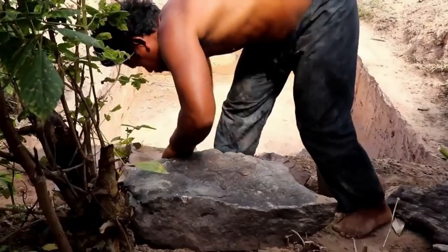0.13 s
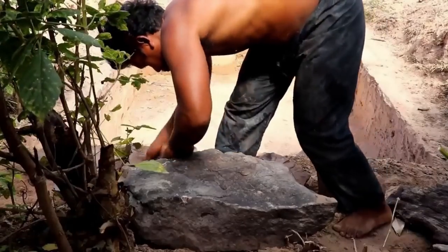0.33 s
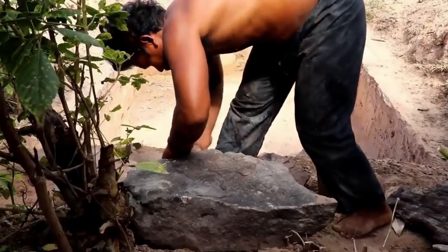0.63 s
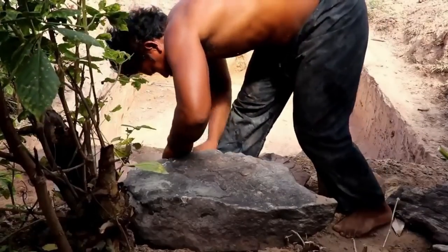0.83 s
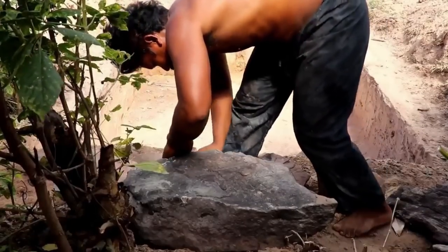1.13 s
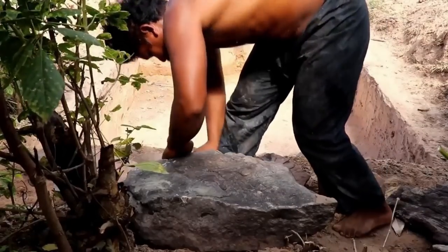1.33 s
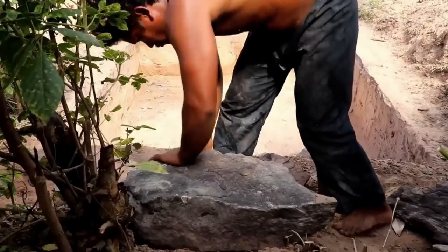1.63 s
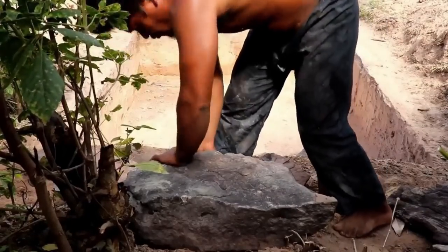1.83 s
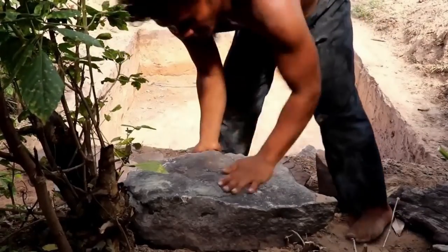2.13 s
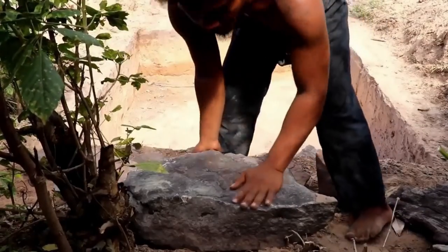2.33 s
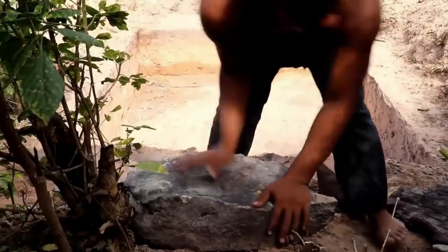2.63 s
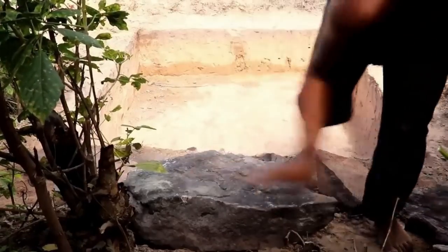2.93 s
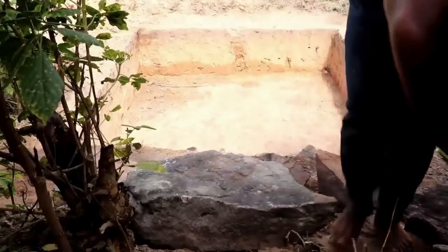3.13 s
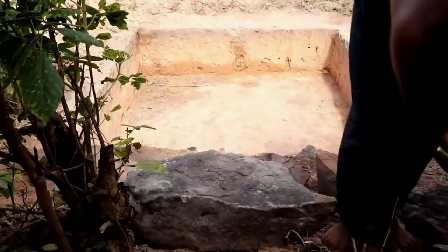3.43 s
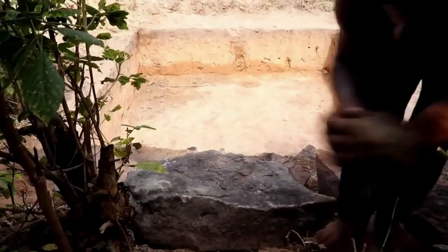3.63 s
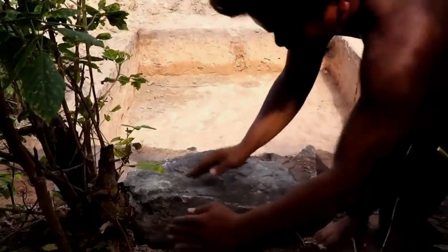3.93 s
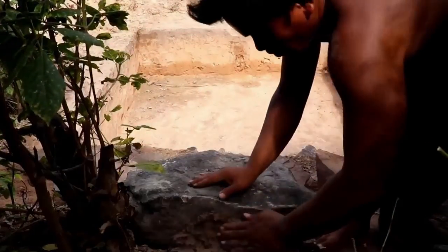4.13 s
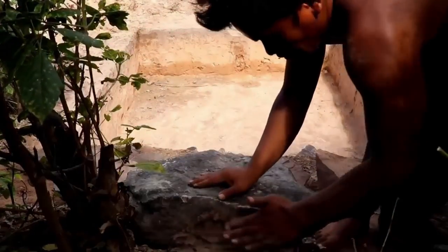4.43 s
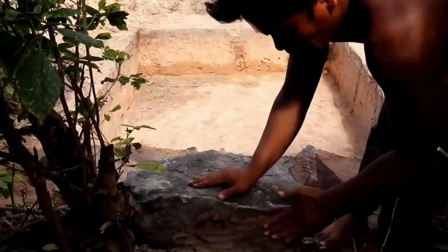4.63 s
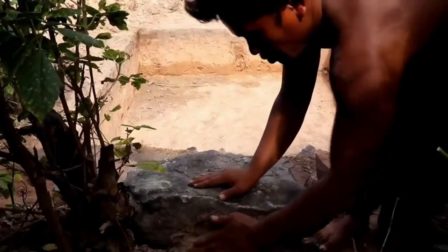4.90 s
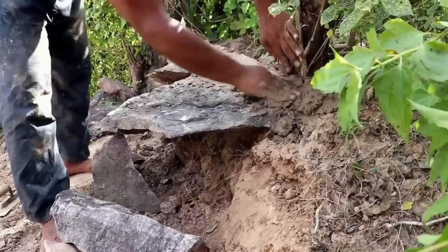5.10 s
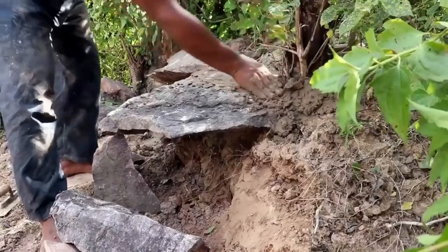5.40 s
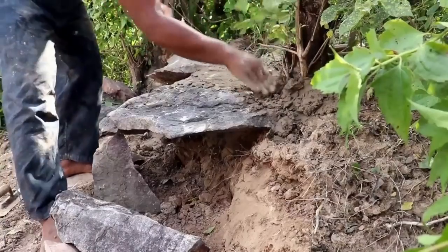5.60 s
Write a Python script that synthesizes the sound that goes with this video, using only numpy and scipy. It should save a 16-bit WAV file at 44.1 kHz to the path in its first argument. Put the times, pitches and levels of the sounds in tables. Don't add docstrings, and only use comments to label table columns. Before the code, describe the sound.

Close stereo outdoor capture of hands working soil on a stone slab: short gritty scrapes, dull ground thumps, then dry stone knocks at intervals. Leaves rustle faintly in a breeze over low rumble. After a quieter, soft passage come several hard clacks, the middle one loudest. A tiny gap follows, then faint soil pats from a farther, calmer position with a distant low machine drone.

```python
import sys
import numpy as np
from scipy import signal
from scipy.fft import rfft, irfft
from scipy.io import wavfile
from scipy.ndimage import uniform_filter1d

SR = 44100
rng = np.random.default_rng(int(sys.argv[2]) if len(sys.argv) > 2 else 0)


def invert_db(x):
    u = np.asarray(x, float) / 20
    return 10 ** u


def materialize(psi):
    bounded = np.clip(np.atleast_2d(psi).T, -1, 1)
    quanta = np.round(bounded * 32767).astype(np.int16)
    wavfile.write(sys.argv[1], SR, quanta)


N = 254016

# (frequency [Hz], density [dB per Hz])
AIR_SPECTRUM = [(76, -27), (130, 1), (296, -7.5), (562, -3.5), (900, -4.5), (1500, -3.5), (2100, -4.5),
                (3770, -11.5), (4700, -12), (8760, -18), (13100, -25.5), (14700, -27.5), (15500, -46)]
# (frequency [Hz], likeness [0-1])
AIR_LIKENESS = [(60, 0.38), (180, 0.58), (550, 0.15), (1650, 0.018), (4970, 0.1), (15000, 0.02)]
# (frequency [Hz], level [dB])
AIR_LEAN = [(60, 0.5), (180, 1.5), (550, 1.5), (1650, -1.5), (4970, -0.5), (15000, 0)]
# (time [s], breeze [dB], dryness of leaves [dB])
BREEZE = [
    [(0, -43.5, -5.5), (.31, -48, 2.5), (.69, -49.5, 2.5), (1.32, -47.5, 1.5), (1.61, -46.5, -2.5),
     (1.9, -48, -0.5), (2.15, -45.5, -3), (2.5, -48.5, 1), (3.1, -49.5, -.5), (3.4, -48, 4),
     (3.72, -49, 3.5), (4.1, -46.5, 0.5), (4.51, -50, 5.5), (5.0, -50, 5.5)],
    [(5.065, -53.5, 0), (5.21, -56, 4), (5.36, -54.5, 1.5), (5.76, -55.5, 5)],
]
# (time [s], level [dB], time to sink 13 dB [s])
BUMPS = [(.02, -54, 1), (.3, -50.5, 0.5), (.5, -48.5, .13), (.67, -46, .09), (.95, -48, .1),
         (1.08, -50.5, .25), (1.33, -47, .07), (1.47, -45.5, 0.2), (1.67, -45, 0.15), (1.78, -51, 0.12),
         (2.06, -48, .1), (2.27, -48, .1), (2.44, -48.5, 0.1), (2.72, -47, 0.26), (2.89, -43.5, 0.04),
         (3.2, -48, 0.3), (3.39, -48, .2), (3.51, -51.5, .12), (3.85, -51, .3), (4.01, -38.5, .04),
         (4.24, -48.5, 0.3), (4.52, -45.5, .1), (4.67, -48.5, .08), (4.8, -46, .09), (5.03, -47, 0.24),
         (5.165, -50.5, .1), (5.31, -57, .05), (5.567, -57, .08), (5.74, -56.5, 0.5)]
# (start [s], frequency [Hz], width [Hz], level [dB])
DRONE = (5, 160.5, 7.5, -57.5)
# (time [s], length [s], from [Hz], to [Hz], level [dB])
HUMS = [(.495, .04, 92, 88, -50), (.655, 0.059, 88, 80, -48), (2.855, .12, 122.3, 98, -49),
        (3.17, .09, 95, 72, -53), (3.355, .18, 90, 98, -50), (4.19, 0.13, 90, 85, -53),
        (5.07, 0.12, 165.4, 150, -55), (1.6, .1, 151, 141, -55), (4.06, .085, 540, 530, -56),
        (4.23, .065, 530, 520, -57), (3.72, .025, 2420, 2400, -52), (.135, .025, 1840, 1740, -53)]
# (frequency [Hz], density [dB per Hz])
GRIT_SPECTRUM = [(59, -31), (100, -1), (412, 1.5), (700, -4), (1000, -5), (1770, -5.5), (4500, -10),
                 (12900, -20), (15700, -31)]
LAYER_EDGES_HZ = (150, 800, 3500, 8000)
# (time [s], length [s], grit [dB], thud minus grit [dB], sand minus grit [dB])
DIGS = [(.256, .04, -44, -6, -5), (1.407, 0.045, -41, -6, -4.5), (2.031, .051, -46.5, -.5, -1),
        (2.685, 0.052, -43, -3, -1.5), (3.172, 0.058, -48, -2, -1), (3.355, 0.078, -50, 1, 3),
        (3.806, 0.063, -52, 2, 7.5), (4.507, 0.033, -37, -4, -10), (4.675, 0.029, -44, -5, 2),
        (4.743, 0.033, -47.5, 0, 9), (0.378, .155, -49.5, -2, -7), (1.411, .012, -47, -9, 0),
        (5.128, 0.0092, -51, -9, 1), (4.914, .014, -54, -4, 13), (.068, 0.07, -51.5, -14, -7)]
# (time [s], length [s], grit [dB], thud minus grit [dB], sand minus grit [dB])
SWEEPS = [(.295, 0.021, -45, -14, -2), (.315, .072, -43, -10, -4), (.41, .037, -50, -3, -14),
          (.642, 0.054, -47.5, -4, -2.5), (1.054, 0.035, -33, -20, -8), (1.315, .02, -45, 2, -6),
          (1.439, .04, -39, 4, -7), (1.468, .075, -37.5, -5, -4), (1.57, 0.053, -51.5, -7, -1),
          (1.955, .07, -43, -16, -12), (2.1, .075, -46, -12, -9), (2.855, 0.046, -46.5, 2, -4)]
# (time [s], length [s], grit [dB], thud minus grit [dB], sand minus grit [dB])
PATS = [(4.191, .14, -53, -4, 7), (3.87, 0.13, -59, -3, 9.5), (4.3, .15, -57, -5, 5.5),
        (4.55, 0.07, -54, -9, 5), (4.997, .017, -40, -5, 1), (5.012, 0.038, -42.5, -8, 3.5),
        (5.122, 0.021, -51, 0, -3), (5.231, .011, -48.5, -8, -1), (5.266, .017, -51, -2, -1),
        (5.35, .18, -58.5, -8, -7), (5.555, .03, -55, 5, 3), (5.677, 0.057, -53, 1, -2)]
# (time [s], length [s], grit [dB], thud minus grit [dB], sand minus grit [dB])
SHOVES = [
    (1.235, 0.068, -38.5, -14, -11),
    (1.78, 0.073, -44.5, 1, -6),
    (2.262, 0.061, -37, -8.5, .5),
    (3.47, 0.16, -56, -2.5, 8),
    (3.945, .095, -42, -5, 4),
    (4.9, .042, -49, 2, 5),
    (4.926, 0.012, -50, -6, 11.5),
]
# (time [s], level [dB], thud minus crack [dB], sand minus crack [dB], rise [s])
CRUSHES = [
    (.921, -38, -8, 1, .012),
    (1.047, -29.5, -14, -3.5, .015),
    (1.302, -31, -9, -4, .012),
    (2.448, -31, -9, 5, 0.034),
    (4.005, -39, -2, -2, .12),
    (4.502, -31.5, -7, -1, 0.023),
    (4.669, -26, -12, 2.5, 0.03),
    (4.805, -34, -11, 4, 0.027),
]
# (start [s], end [s], level over grit [dB])
RUBBED = [
    (.1, .8, -4),
    (1.01, 1.6, -3),
    (3.9, 4.1, -5),
]
# (frequency [Hz], width [Hz], level [dB])
FLAT_STONE = [(650, 93, -4), (1110, 58, 3), (1960, 130, -2.5), (2550, 100, -13), (3570, 67, -19)]
# (frequency [Hz], width [Hz], level [dB])
HARD_STONE = [(587, 54, -4), (1260, 64, -2), (1694, 39, -4), (2360, 110, -9), (2790, 81, 0.5),
              (3200, 69, -25), (5300, 530, -11)]
# (frequency [Hz], width [Hz], level [dB])
ROUND_STONE = [(900, 42, 1), (1390, 25, -11), (1840, 150, -5), (3350, 32, -14)]
# (time [s], peak [dB], ring [Hz])
PEBBLES = [(1.0563, -30, 1230), (1.0583, -29, 2730), (1.0633, -32, 4480), (1.0648, -35, 3940),
           (1.0648, -27, 1700), (1.0688, -34, 3620), (1.0723, -31, 4030), (1.0797, -39, 4440),
           (1.2688, -34, 2330), (1.2758, -34, 4480), (1.2808, -31, 2800), (1.2838, -35, 1080),
           (1.2863, -33, 1940), (1.2868, -31, 2690), (1.3102, -37, 4290), (1.3127, -33, 1120),
           (1.4205, -34, 1010), (1.4235, -38, 3810), (1.4245, -32, 1640), (1.425, -38, 3170),
           (1.4319, -34, 1060), (1.4419, -34, 2890), (1.4464, -34, 2050), (1.4534, -31, 2730),
           (1.4559, -32, 1120), (1.4629, -31, 2760), (1.4768, -34, 1310), (1.4773, -35, 2730),
           (1.4793, -38, 4890), (1.4843, -35, 2370), (1.4893, -36, 4780), (1.4933, -34, 1230),
           (1.5103, -31, 490), (4.673, -24, 3270), (1.441, -33, 1270), (3.962, -37, 1130),
           (1.5167, -33, 4820), (1.5172, -36, 2780), (1.5222, -34, 560), (2.289, -34, 4500),
           (2.2895, -38, 3920), (2.2945, -35, 3380), (2.295, -34, 3060), (2.297, -35, 4410),
           (2.297, -34, 2150), (2.3075, -33, 4650), (2.3089, -34, 600), (2.4382, -35, 3400),
           (3.9662, -40, 4930), (3.9826, -40, 4690), (3.9946, -32, 1810), (4.0061, -36, 4410),
           (4.0196, -32, 1030), (4.6591, -29, 1290), (4.7419, -38, 3400), (4.7494, -38, 4780),
           (4.7938, -40, 4740)]
# (time [s], peak [dB], ring [Hz])
GRAVEL = [(0.2569, -43, 3340), (0.2574, -39, 880), (0.2619, -39, 2610), (0.2654, -38, 1270),
          (0.2659, -40, 1810), (0.2674, -34, 690), (0.3003, -41, 2910), (0.3023, -35, 1960),
          (0.3028, -38, 1270), (0.3128, -42, 2890), (0.3238, -38, 1460), (0.3253, -39, 1100),
          (0.3327, -41, 620), (0.3352, -42, 1120), (0.3372, -42, 2540), (0.3442, -37, 1960),
          (0.3457, -39, 620), (0.3552, -41, 600), (0.3557, -33, 1140), (0.3592, -37, 2000),
          (0.3672, -37, 1790), (0.3801, -40, 1920), (0.3961, -40, 2020), (0.4111, -40, 650),
          (0.417, -37, 1120), (0.425, -34, 1140), (0.458, -42, 2650), (0.4944, -42, 2520),
          (1.7775, -40, 540), (1.8243, -41, 2370), (1.8308, -38, 1740), (1.9805, -41, 2350),
          (1.986, -39, 1250), (1.9895, -40, 2350), (1.993, -37, 1420), (1.9975, -38, 2300),
          (2.0084, -40, 1940), (2.0468, -38, 690), (2.0508, -40, 2090), (2.1272, -39, 1210),
          (2.1331, -40, 2090), (2.6904, -41, 2990), (2.6944, -38, 540), (2.6959, -41, 2840),
          (2.8655, -40, 560)]
# (time [s], peak [dB], ring [Hz])
CLODS = [
    (.39, -42, 240),
    (.43, -42, 220),
    (1.83, -40, 210),
    (2.3, -40, 240),
]
# (time [s], peak [dB], ring [Hz])
GRIPPED = [(.9213, -19, 1750), (1.3016, -14.5, 395), (4.8053, -21, 5250), (4.6678, -20, 2600),
           (.9215, -26, 3550), (.9228, -27, 4750), (.9234, -26, 1550), (1.0453, -26, 5800),
           (1.301, -16, 2800), (1.304, -23, 1880), (1.413, -40, 3500), (2.4478, -23, 4500),
           (4.5025, -18, 2840), (4.509, -24, 1510), (4.6674, -6.5, 3250), (4.6708, -23, 560),
           (.9225, -28.5, 420), (5.0015, -30, 7600), (3.178, -38, 4000), (2.4466, -23, 560),
           (4.5005, -24, 430), (4.5008, -27, 4200), (4.6661, -21, 4480), (1.0468, -26, 2670),
           (.9206, -29, 4500), (1.3215, -33, 290), (3.9845, -31, 900), (1.447, -33, 650), (3.992, -30, 900),
           (2.4482, -19, 3300), (4.6712, -15, 5950), (4.8052, -11, 6640), (4.8056, -13.5, 3200),
           (4.806, -23, 485), (5.13, -39, 6000), (5.234, -31, 2700), (5.2345, -41, 5300),
           (.9222, -24, 4250), (1.3035, -26, 6800), (2.4505, -21, 7500)]
# (time [s], peak [dB], ring [Hz])
LOOSE = [(.9215, -32.5, 230), (.922, -26, 604), (1.0482, -18, 1200), (1.049, -20, 1960),
         (1.0678, -24, 2600), (1.0722, -23, 1900), (1.072, -36, 300), (1.048, -35, 280), (1.3015, -21, 285),
         (1.3025, -27, 3150), (1.3018, -22, 2130), (.9232, -27, 1310), (.9214, -21, 2040),
         (2.4472, -26, 1130), (2.4485, -27, 2760), (4.6688, -22, 3730), (4.67, -22, 8000),
         (3.9925, -31, 1040), (4.0025, -30, 2060), (4.0005, -33, 440), (1.3025, -23, 1065),
         (1.3033, -23, 685), (2.4477, -14.5, 3500), (2.4477, -14.5, 2460), (2.4505, -27, 350),
         (2.45, -31, 160), (2.4506, -16, 2450), (2.4502, -24, 2200), (4.0008, -24, 930), (4.0108, -25, 900),
         (4.0085, -30, 220), (3.995, -30, 400), (4.0235, -31, 480), (4.026, -32, 620), (4.503, -26.5, 288),
         (4.6688, -10.5, 1090), (4.6676, -21, 790), (4.6712, -32, 440), (4.6705, -20, 2200),
         (4.669, -10.5, 1720), (4.6696, -12.5, 7400), (4.67, -34, 260), (4.934, -30, 7540),
         (5.004, -31, 3120), (5.2722, -37, 2500), (5.2765, -38, 470)]
# (time [s], peak [dB], ring [Hz])
BEDDED = [(1.4445, -24, 265), (1.449, -29, 620), (1.501, -34, 240), (1.4845, -38, 300), (4.039, -38, 380),
          (1.4585, -18, 246), (1.461, -26, 595), (1.4735, -27, 230), (1.4715, -31, 370), (1.4465, -29, 340),
          (1.4605, -26, 330), (4.0275, -29, 375), (5.007, -40, 580), (1.431, -31, 255)]
# (time [s], peak [dB], ring [Hz])
DEAD = [
    (5.1305, -38, 3500),
    (4.5017, -13.5, 1100),
    (4.8052, -12, 1500),
    (4.8061, -16, 990),
    (1.3006, -17, 1060),
    (2.4476, -14.5, 2150),
]
# (time [s], spread of low soil sound [dB])
WIDTH = [(0, 0), (.33, 1), (.7, -2), (.92, -8), (1.07, -7), (1.3, -8), (1.5, -5), (1.7, -2), (2.1, -2),
         (2.3, -4), (2.45, -9), (2.95, -2), (3.6, 0), (4.0, 3), (4.35, 0), (4.5, -10), (4.9, -8),
         (5.76, -2)]
# (start [s], end [s])
JOINED = [(.148, .226), (.479, .627), (.705, .827), (.981, 1.042), (1.1, 1.19), (1.355, 1.527),
          (1.591, 1.62), (1.93, 2.133), (2.47, 2.7), (3.654, 4.479), (4.838, 4.92)]
# (start [s], end [s], level [dB])
GAP = (5.043, 5.064, -20)


def evened(x):
    return x / np.sqrt(np.mean(x ** 2) + 1e-20)


def read(points, hz):
    f, value = np.transpose(points)
    return np.interp(np.log(hz + 1), np.log(f + 1), value)


def follow(tables):
    s, *columns = np.concatenate(tables).T
    return [np.interp(np.arange(N) / SR, s, c) for c in columns]


def split(x, colour):
    hz = np.fft.rfftfreq(N, 1 / SR)
    z = rfft(x) * invert_db(read(colour, hz))
    above = [1 / (1 + (edge / (hz + 1)) ** 6) for edge in LAYER_EDGES_HZ] + [0]
    return [evened(irfft(z * np.sqrt(np.maximum(a - b, 0)), N)) for a, b in zip(above, above[1:])]


def resonate(x, hz, width_hz):
    turn = np.exp(2j * np.pi * np.cumsum(hz * np.ones(x.shape[-1])) / SR)
    r = np.exp(-np.pi * width_hz / SR)
    return 2 * (turn * signal.lfilter([1 - r], [1, -r], x / turn)).real


def air(patchy_db=1.9):
    frames, hz = N // 128 + 5, np.fft.rfftfreq(512, 1 / SR)
    a, b, c, d, patches = rng.standard_normal((frames, 257, 5)).T
    patches = uniform_filter1d(patches, size=6, axis=0)
    patches = evened(uniform_filter1d(patches, size=16, axis=1))
    same = np.clip(read(AIR_LIKENESS, hz), 0, 1)[:, None]
    left = a + 1j * b
    right = same * left + np.sqrt(1 - same ** 2) * (c + 1j * d)
    lean_db = np.multiply.outer([.5, -.5], read(AIR_LEAN, hz))[..., None]
    z = np.array([left, right]) * invert_db(patchy_db * patches + lean_db)
    return signal.istft(z, nperseg=512, noverlap=384)[1][:, :N]


def rustle():
    breeze_db, dry_db = follow([*BREEZE])
    wash, leaves, hiss, fine = split(air(), AIR_SPECTRUM)
    wash_db = -54.8 + .9 * (breeze_db + 48)
    hiss_db = breeze_db - 5.0 + .5 * dry_db
    fine_db = breeze_db - 11 + dry_db
    return invert_db(wash_db) * wash + invert_db(breeze_db + 0.54) * leaves + invert_db(hiss_db) * hiss + invert_db(fine_db) * fine


def rumble(width_hz=35, apart=0.61):
    t = np.arange(N) / SR
    sink_db, quicker_rise = 13, 0.85
    bumps_db = [db - sink_db * np.maximum((s - t) / quicker_rise, t - s) / sink_s for s, db, sink_s in BUMPS]
    level_db = np.max(bumps_db, axis=0).clip(-75)
    ground_hz = 95.6 + 0.55 * (level_db + 52)
    a, b = rng.standard_normal((2, N))
    noise = np.array([a + apart * b, a - apart * b])
    hum = resonate(resonate(noise, ground_hz, width_hz), ground_hz, width_hz)
    base_band = signal.butter(2, [45, 165], "band", fs=SR, output="sos")
    wind_band = signal.butter(2, [40, 78], "band", fs=SR, output="sos")
    base = signal.sosfilt(base_band, noise[:, ::-1])
    wind = signal.sosfilt(wind_band, np.roll(noise, SR, axis=1))
    start_s, drone_hz, drone_width_hz, drone_db = DRONE
    drone = resonate(resonate(noise, drone_hz, drone_width_hz), drone_hz, drone_width_hz)
    drone = evened(drone) * (np.arange(N) > start_s * SR)
    ground = np.hypot(invert_db(level_db + 0.2), invert_db(-60.5)) * evened(evened(hum) + invert_db(1.5) * evened(base))
    wind_db = -60 + 3.5 * (t > start_s)
    return ground + invert_db(wind_db) * evened(wind) + invert_db(drone_db) * drone


def footing():
    out = np.zeros(N)
    for s, length_s, from_hz, to_hz, db in HUMS:
        hz = np.linspace(from_hz, to_hz, round(length_s * SR))
        hum = np.sin(2 * np.pi * np.cumsum(hz) / SR) * signal.windows.tukey(len(hz), .4)
        at = round(s * SR)
        out[at:at + len(hz)] += invert_db(db + 2.0) * hum
    return out


def layers(thud_db, sand_db, dust_db=-6.5, dryness=1.3):
    return invert_db([thud_db, 0, sand_db - .8, dryness * sand_db + dust_db])


def strokes():
    t, power = np.arange(N) / SR, np.zeros((4, N))
    for rows, rising in (DIGS, 0.25), (SWEEPS, 0.44), (PATS, 0.48), (SHOVES, 0.73):
        for s, length_s, grit_db, thud_db, sand_db in rows:
            part = slice(round(s * SR), round((s + length_s) * SR))
            u = (t[part] - s) / length_s
            bite = np.clip(u / rising, 0, 1) ** (1.75 * rising ** 2)
            release = np.clip((1 - u) / (1 - rising), 0, 1) ** 0.87
            stroke = invert_db(grit_db - 2.5) * bite * release
            power[:, part] += np.outer(layers(thud_db - 0.5, sand_db + 0.47), stroke) ** 2
    return power


def crushing():
    t, power = np.arange(N) / SR, np.zeros((4, N))
    for s, crack_db, thud_db, sand_db, rise_s in CRUSHES:
        fall_s = max(0.037, rise_s)
        away = np.maximum((s - t) / rise_s, (t - s - .002) / fall_s).clip(0, 3)
        power += np.outer(layers(thud_db, sand_db), invert_db(crack_db - 60 * away)) ** 2
    return power


def soil(low_db, grains_per_s=12000, spread_db=3.0):
    stroked, crushed = strokes(), crushing()
    sizes = invert_db(spread_db * rng.exponential(1, (2, N)).clip(0, 4))
    grains = sizes * (rng.random((2, N)) < grains_per_s / SR)
    grains = grains * rng.choice([-1., 1.], grains.shape)
    flat = np.zeros(N)
    wide = invert_db([[flat, low_db - 2], [flat, low_db], [flat, flat], [flat, flat]])
    out = (np.sqrt(stroked + crushed)[:, None] * wide * split(grains, GRIT_SPECTRUM)).sum(0)
    for (start_s, end_s, sing_db), modes in zip(RUBBED, (FLAT_STONE, HARD_STONE, ROUND_STONE)):
        part = slice(round(start_s * SR), round(end_s * SR))
        song = evened(sum(invert_db(db) * resonate(grains[:, part], hz, width_hz) for hz, width_hz, db in modes))
        out[:, part] += invert_db(sing_db) * np.sqrt(stroked[1, part]) * wide[1][:, part] * song
    return out


def rings(contacts, t60_1khz_s):
    out, t = np.zeros(N + 8000), np.arange(8000) / SR
    for s, db, hz in contacts:
        t60_s = t60_1khz_s * (1000 / hz) ** .35
        onset = 1 - np.exp(-3.0 * t * hz)
        ring = invert_db(-60 * t / t60_s) * np.sin(2 * np.pi * hz * t) * onset
        at = round(s * SR)
        out[at:at + 8000] += invert_db(db) * ring / abs(ring).max()
    return out[:N]


def debris():
    return rings(PEBBLES, .016) + rings(GRAVEL, .022) + rings(CLODS, .04)


def stones():
    return rings(DEAD, 0.0027) + rings(GRIPPED, 0.0089) + rings(LOOSE, 0.016) + rings(BEDDED, 0.034)


def near_ground(x, low_db, t60_s=.008, side_db=-8.5, lean_db=-0.4, bass_hz=1100, bank_s=.0012):
    t = np.arange(600) / SR
    scatter = rng.standard_normal(len(t)) * invert_db(-60 * t / t60_s)
    side = signal.oaconvolve(x, scatter / np.linalg.norm(scatter))[:N]
    side = invert_db(side_db) * signal.lfilter(*signal.butter(2, bass_hz, "high", fs=SR), side)
    bass = signal.lfilter(*signal.butter(2, bass_hz, fs=SR), np.roll(x, round(bank_s * SR)))
    side = side + invert_db(1.5 * low_db - 4) * bass
    return invert_db([[lean_db], [0]]) * np.array([x - side, x + side])


def scene():
    low_db, = follow([WIDTH])
    background = rustle() + rumble() + footing()
    middle, spread = soil(low_db) * invert_db([[-.3], [-1.6]])
    ground = invert_db([[-.6], [0]]) * np.array([middle + spread, middle - spread])
    return background + ground + near_ground(debris() + stones(), low_db)


def join_treble(x, treble_hz=4600, side_db=-30, lift_db=1.2, spared_share=.1):
    middle_side = np.array([x[0] + x[1], x[0] - x[1]]) / 2
    hz, t, z = signal.stft(middle_side, SR, nperseg=1024, noverlap=768)
    joined = np.outer(hz > treble_hz, sum(1. * (t > a) * (t < b) for a, b in JOINED))
    spared = rng.random((len(t) // 8 + 1, len(hz) // 10 + 1)).T < spared_share
    spared = np.kron(spared, np.ones((10, 8)))[:len(hz), :len(t)]
    gains = invert_db([lift_db * joined, side_db * joined * (1 - spared)])
    middle, side = signal.istft(z * gains, SR, nperseg=1024, noverlap=768)[1][:, :N]
    return np.array([middle + side, middle - side])


def top_cut(x):
    return signal.sosfilt(signal.butter(12, 15810, fs=SR, output="sos"), x)


def record(dry):
    start_s, end_s, depth_db = GAP
    corners_s = [start_s - .006, start_s, end_s - .002, end_s]
    gap_db = np.interp(np.arange(N) / SR, corners_s, [0, depth_db, depth_db, 0])
    knee = 1.25 * np.tanh(dry * invert_db(gap_db) / 1.25)
    port = signal.firwin(301, 15450, window=("kaiser", 8), fs=SR)
    limited = signal.oaconvolve(knee, port[None], "same")
    return top_cut(join_treble(limited))


dry = scene()
out = record(dry)
materialize(out)
```